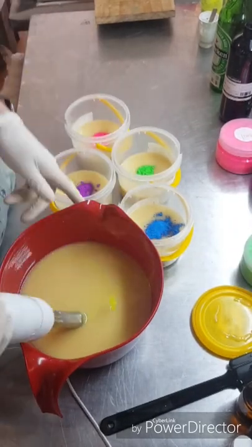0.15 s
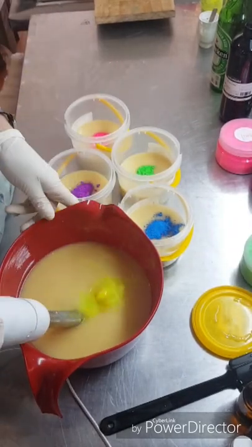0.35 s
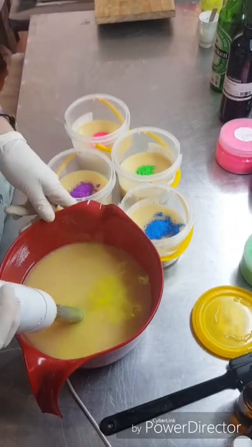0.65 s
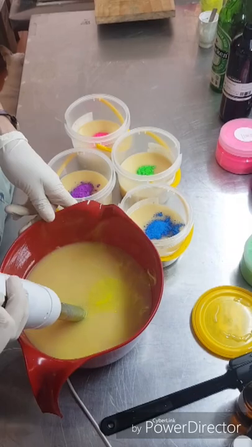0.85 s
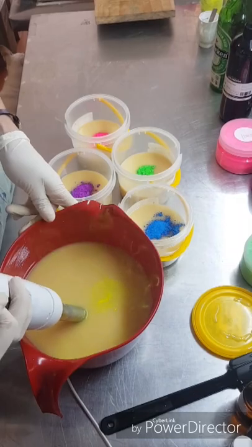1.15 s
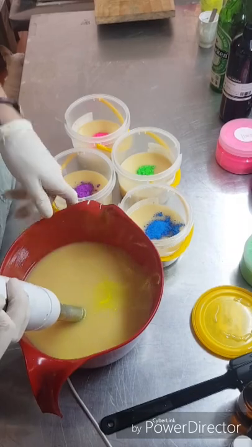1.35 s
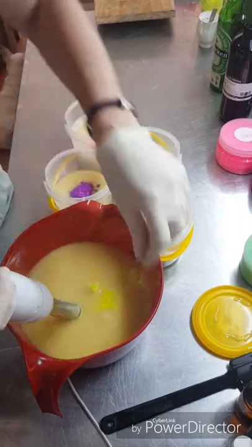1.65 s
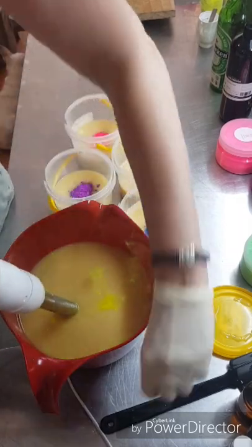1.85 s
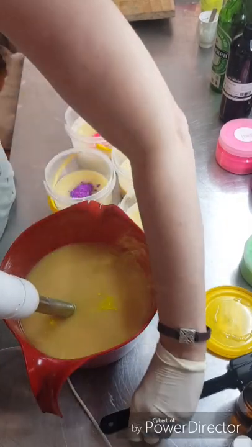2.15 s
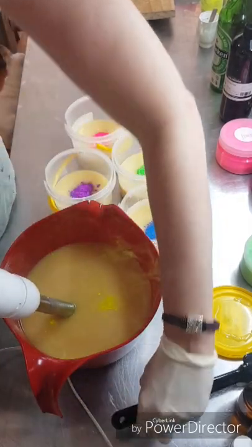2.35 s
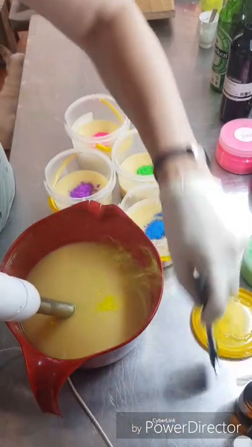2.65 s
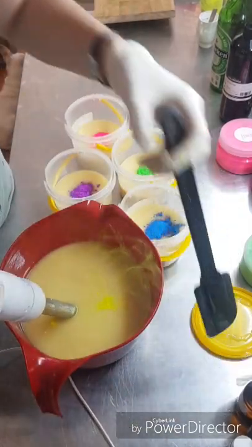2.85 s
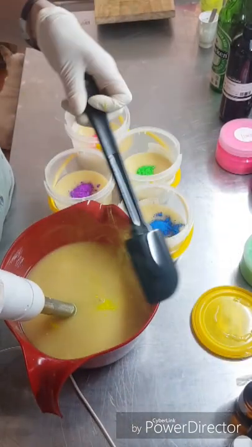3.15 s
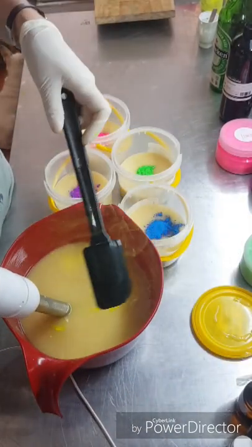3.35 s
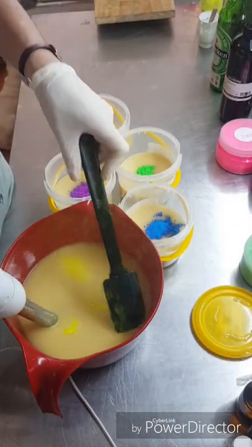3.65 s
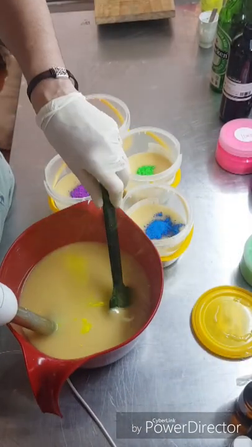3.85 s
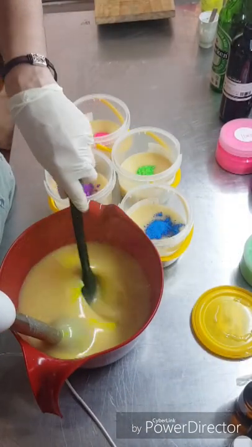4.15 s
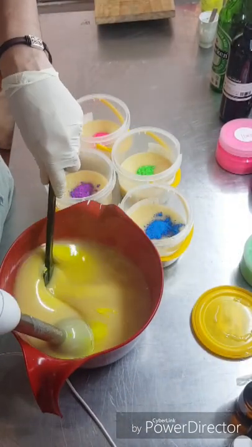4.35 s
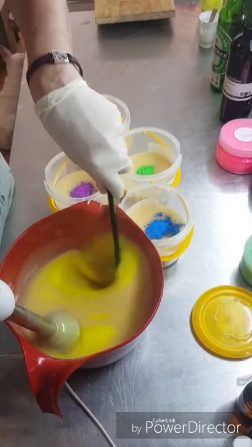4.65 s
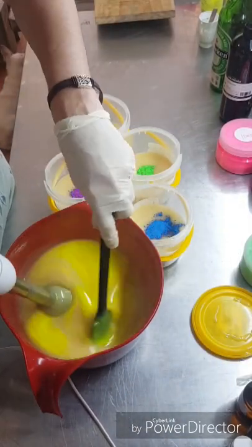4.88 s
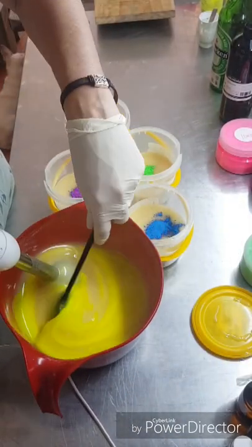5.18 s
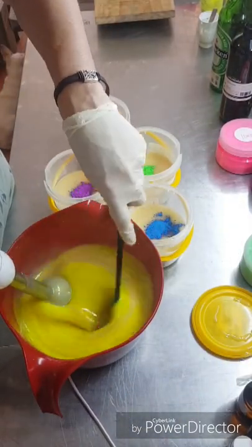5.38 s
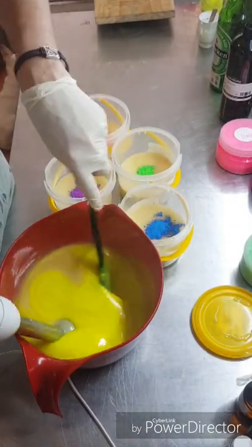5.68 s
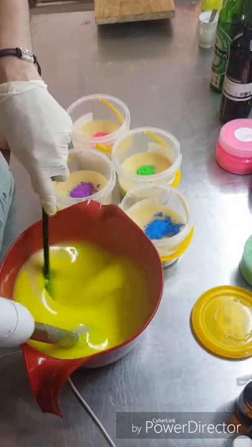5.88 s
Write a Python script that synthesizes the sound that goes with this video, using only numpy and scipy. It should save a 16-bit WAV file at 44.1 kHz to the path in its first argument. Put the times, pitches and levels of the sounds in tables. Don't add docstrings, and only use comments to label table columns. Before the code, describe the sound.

A handheld phone microphone close to a bowl catches hollow taps with a little steel ring and low table booms, then a stick blender pulsing four times in thick batter: a brighter, louder pair, a pause with gentle knocks, and a duller pair with the longest burst. Afterwards come only faint taps, tiny glove snaps and small bumps, with a low fridge hum in a small room.

```python
import sys
import numpy as np
from scipy import signal
from scipy.io import wavfile
from scipy.ndimage import uniform_filter1d

SR = 44100
rng = np.random.default_rng(int(sys.argv[2]) if len(sys.argv) > 2 else 0)


def generate_wav(sig):
    pcm = np.round(np.clip(np.atleast_2d(sig).T, -1, 1) * 32767).astype(np.int16)
    wavfile.write(sys.argv[1], SR, pcm)


def invert_db(x):
    u = np.asarray(x, float) / 20
    return 10 ** u


N = 265482
SIDE = np.array([[.5], [-.5]])


def evened(x):
    return x / np.sqrt(np.mean(x ** 2) + 1e-20)


def read(points, hz):
    f, value = np.transpose(points)
    return np.interp(np.log(hz + 1), np.log(f + 1), value)


def add(mix, s, sound):
    part = mix[..., round(s * SR):][..., :sound.shape[-1]]
    part += sound[..., :part.shape[-1]]


def wander(count, rate_hz):
    slow = signal.butter(2, rate_hz, fs=SR, output="sos")
    return evened(signal.sosfilt(slow, rng.standard_normal(count)))


def noise(count, colour, same, lean, patchy_db, size=512):
    hz = np.fft.rfftfreq(size, 1 / SR)
    a, b, c, d, patches = rng.standard_normal((count * 4 // size + 5, len(hz), 5)).T
    patches = uniform_filter1d(patches, size=4, axis=0)
    patches = evened(uniform_filter1d(patches, size=12, axis=1))
    like = np.clip(read(same, hz), -1, 1)[:, None]
    left = a + 1j * b
    right = like * left + np.sqrt(1 - like ** 2) * (c + 1j * d)
    z = np.array([left, right]) * invert_db(colour(hz)[:, None] + patchy_db * patches)
    z = z * invert_db(np.outer(SIDE, read(lean, hz)))[..., None]
    return signal.istft(z, nperseg=size, noverlap=size * 3 // 4)[1][:, :count]


def band_rms(x, lo, hi):
    band = signal.butter(4, [lo, hi], "band", fs=SR, output="sos")
    return np.std(signal.sosfilt(band, x.mean(0)))


def ring(modes, t, spread):
    out = 0
    for k, (hz, db, t60, lean_db, lead) in enumerate(modes):
        swing = 2 * np.pi * hz * (1 + spread * rng.standard_normal()) * t + 0.62 * k * k
        level_db = db + 2.1 * rng.standard_normal() - 60 * t / t60 + SIDE * lean_db
        out = out + invert_db(level_db) * np.sin(swing + SIDE * lead)
    return out


# (frequency [Hz], level [dB], waver [share])
FRIDGE_HUM = [(48.3, -61.5, 0.14), (74, -71, 1.9), (101, -55.5, .15), (113, -65.5, 2.2)]
# (frequency [Hz], level [dB per Hz])
ROOM_AIR = [(20, -12.5), (60, -5.5), (140, -3), (200, -8.5), (235, -12.5), (380, -12.5), (480, -19.5),
            (800, -32), (2200, -33), (6500, -36), (9000, -36), (15400, -33.5)]
# (frequency [Hz], likeness [-1 to 1])
AIR_SAME = [(60, 0.54), (240, 0.22), (950, 0.42), (3770, 0.19), (15000, -0.21)]
# (frequency [Hz], left-right [dB])
AIR_LEAN = [(60, -2), (240, 0.5), (950, -0.5), (3770, -3), (15000, 4)]


def fridge():
    t, lag_rad, hum = np.arange(N) / SR, .6, 0
    for hz, db, waver in FRIDGE_HUM:
        drift = 1 + waver * (wander(N, 4) + 1j * wander(N, 4.3))
        line = (drift * np.exp(2j * np.pi * hz * t - 1j * SIDE * lag_rad)).real
        hum = hum + invert_db(db + 4.5) / np.hypot(1, waver) * line
    air = noise(N, lambda f: read(ROOM_AIR, f), AIR_SAME, AIR_LEAN, patchy_db=3.0, size=2048)
    return hum * invert_db(SIDE * -1) + invert_db(-70.5) * air / band_rms(air, 146, 15800)


# (time [s], knock level [dB], steel ring level [dB])
KNOCKS = [(0.006, -25, -47), (0.089, -37, -63), (0.153, -38, -64), (0.197, -45, -85), (0.267, -44, -84),
          (0.407, -20.5, -41), (0.47, -31.5, -85), (0.487, -26, -46.5), (0.625, -22.5, -45.5),
          (0.704, -28, -51.5), (2.283, -34, -61), (2.365, -38, -65.5), (2.472, -52, -70.5),
          (2.555, -43.5, -69), (3.757, -45, -80), (3.822, -42, -65), (3.902, -33, -57), (3.977, -38.5, -59),
          (4.049, -36, -58.5), (4.12, -40.5, -70), (4.192, -38, -64), (4.261, -45, -74),
          (4.322, -42.5, -73), (4.376, -47.5, -86.5), (5.152, -39.5, -66), (5.235, -39.5, -63),
          (5.319, -53, -88.5), (5.902, -44, -83), (5.985, -55.5, -96)]
# (frequency [Hz], level [dB], T60 [s], left-right [dB], left lead [rad])
BOWL_MODES = [(192, 5, 0.15, -0.5, 4), (547.5, 15, 0.029, -4, 3.5), (760, 1, 0.15, -4.5, 2),
              (1010, -0.5, 0.042, 12, 5), (1125, 2, 0.04, 6, 4), (1546, -17.5, 0.15, 5.5, -3),
              (1870, -23.5, 0.054, -1, -1.5)]
BELL_MAIN = [(2727, 0.013, 0.21, -12, .3)]
BELL_UPPER = [(3290, -12.5, 0.22, -18.5, 0.22), (5570, -24.5, 0.04, -32, 0), (6400, -20, 0.06, -7, 0)]


def knock(knock_db, ring_db):
    t = np.arange(9000) / SR
    hard_db = -39.5
    upper_db = hard_db + 1.3 * (ring_db - hard_db)
    damped = invert_db(-13 / (1 + np.exp(-(t - .013) / .0015)))
    onset = np.sin(np.minimum(t / 0.0035, 1) * np.pi / 2) ** 2
    bowl = ring(BOWL_MODES, t, spread=0.02) * damped * onset
    bell = invert_db(ring_db - 6.5) * ring(BELL_MAIN, t, spread=0.0022)
    bell = bell + invert_db(upper_db - 4.5) * ring(BELL_UPPER, t, spread=.001)
    sunk = invert_db(-10 / (1 + np.exp(-(t - .055) / 0.019)) + 0.65 * wander(len(t), 60))
    return invert_db(knock_db - 12) * bowl + bell * sunk * np.minimum(t / 0.0013, 1)


# (time [s], table boom level [dB], clatter level [dB])
THUDS = [
    (0.325, -33.5, -75),
    (0.337, -35.5, -49.5),
    (0.545, -32, -47.5),
    (4.377, -49, -72.5),
    (5.276, -57, -73.5),
    (5.822, -44.5, -62.5),
    (5.859, -50, -73),
]
# (frequency [Hz], level [dB], T60 [s], left-right [dB], left lead [rad])
TABLE_MODES = [(66, 8, 0.38, -1.5, -1.4), (124, 0, 0.84, -1.5, -0.31), (202, -28, 0.19, -1, -1.2),
               (347.4, -12, 0.036, -21, -0.77), (690, -5, 0.054, 0.5, -.5), (1240, -51, 0.041, -7, 0.83),
               (1760, -36, 0.11, -9, 0.13), (2646, -29.5, 0.071, 1, 0.61)]
# (frequency [Hz], level [dB])
CLATTER = [(200, 15), (600, 11), (1300, -4), (1950, 1), (2500, -5), (4000, -17.5), (6500, -29),
           (9000, -40.5)]
# (frequency [Hz], likeness [-1 to 1])
CHURN_SAME = [(60, -1.6), (180, 1), (550, 0.15), (1650, 0.16), (4970, -0.042), (15000, 0.23)]
# (frequency [Hz], left-right [dB])
CHURN_LEAN = [(60, -15), (300, 0), (800, -2.5), (5800, -6), (7000, 1), (8500, 29), (10500, 11), (13000, 7),
              (15000, 1)]


def thud(boom_db, clatter_db):
    t = np.arange(14000) / SR
    rattle = noise(len(t), lambda f: read(CLATTER, f), CHURN_SAME, CHURN_LEAN, patchy_db=3.5, size=256)
    rattle = rattle / band_rms(rattle, 1400, 3200)
    rattle = rattle * invert_db(clatter_db - 2 - 60 * t / 0.22) * np.minimum(t / 0.0011, 1)
    boom = ring(TABLE_MODES, t, spread=0.035) * np.minimum(t / 0.0042, 1)
    return invert_db(boom_db - 5.0) * boom + rattle


# (time [s], level [dB], start [Hz], end [Hz], length [s], wobble [share])
BUBBLES = [
    (0.36, -38, 554, 1110, 0.041, 0.086),
    (2.136, -66, 1880, 2010, 0.081, 0.14),
    (4.805, -68, 870, 760, 0.026, 0.063),
    (5.506, -62, 700, 730, 0.018, 0.017),
]


def bubble(db, start_hz, end_hz, length, wobble):
    part = np.minimum(np.arange(4000) / SR / length, 1)
    hz = (start_hz + (end_hz - start_hz) * part) * (1 + wobble * wander(len(part), 350))
    tone = np.sin(2 * np.pi * np.cumsum(hz) / SR)
    return invert_db(db + 1.1 * wander(len(part), 170)) * tone * np.sin(np.pi * part ** 0.45)


LOADED_HZ = 175.4


def drive(pulses, freed, t):
    begin, rise, share, gained_hz = freed
    creep_hz, spin_up_s, brake_lag_s = 52, .037, .012
    build_s = 0.074
    clear = np.clip((t - begin) / rise, 0, 1)
    coast_s = .11 + (.08 - .11) * clear
    hz, level_db, shaft_db, held = np.zeros((4, len(t)))
    for on, off, churn_db, tone_db, build_db in pulses:
        now, since, after = t >= on, np.clip(t - on, 0, off - on), np.maximum(t - off, 0)
        top = LOADED_HZ + gained_hz * clear
        run = top - (top - np.interp(on, t, hz)) * np.exp(-since / spin_up_s)
        left = np.exp(-after ** 2 / (after + brake_lag_s) / coast_s)
        hz = np.where(now, creep_hz + (run - creep_hz) * left, hz)
        sag_db = build_db * np.exp(-since / build_s) + 3.5 * since
        drag_db = 5 * (t > off) + 58 * after * (1 - share * clear)
        level_db = np.where(now, churn_db - sag_db - drag_db, level_db)
        shaft_db, held = np.where(now, tone_db, shaft_db), np.where(now, since, held)
    churn_db = uniform_filter1d(level_db, size=500) + 2.36 * 20 * np.log10(hz / LOADED_HZ + 1e-3)
    free = np.clip(share * clear * left, 0, 1)
    return hz, free, clear, churn_db, uniform_filter1d(shaft_db, size=900), held


PULSES = [
    [(.899, 1.097, -25.5, 4.5, 26), (1.203, 1.638, -30, -5.5, 1.5)],
    [(2.701, 2.888, -29.5, -11.5, 12.5), (3.007, 3.555, -31.5, -23, 2.5)],
]
# (time [s], rise [s], share [0-1], speed gained [Hz])
FREED = [
    (1.439, .12, 0.8, 6),
    (3.117, 0.128, 0.98, 2.6),
]
# (frequency [Hz], level [dB per Hz])
CHURN = [(35, -42), (70, -22), (150, -14), (240, -21), (330, -7.5), (600, -12.5), (1000, -9.5),
         (2200, -16.5), (3200, -21), (5700, -27.5), (6700, -38), (7500, -37), (8300, -48), (10500, -33),
         (15400, -41.5)]
# (frequency [Hz], width [Hz], level [dB])
HOUSING = [(475, 43, 6), (700, 150, 8), (1330, 13, 6.5), (1607, 48, 4), (1925, 25, 9.5), (2043, 92, 5.5),
           (2328, 140, 2.5), (5310, 440, 1.5)]
# (shaft multiple, level against the fourth [dB])
UPPER_ORDERS = [(3, -2), (4, 0), (5, -7), (6, -15), (7, -5.5), (8, -15), (10, -17)]
# (frequency [Hz], level over churn [dB])
FIRST_PATH = [(100, -8.5), (135, -6), (160, -7), (180, -0.5)]
SECOND_PATH = [(230, -10.5), (295, 0.5), (322, 8), (340, 5.5), (349, 7), (356, -0.5), (364, -15)]
FOURTH_PATH = [(420, -10), (600, -15), (660, 3.5), (730, -8.5)]
# (shaft speed [Hz], level [dB])
COAST_PATH = [(60, 7), (85, 11.5), (105, 14.5), (135, 8), (180, -4)]
# (frequency [Hz], level [dB])
WHINE_PATH = [(1800, -30), (2350, -12), (2560, 5), (2850, 0), (3250, 1), (3550, -3), (3800, -20)]


def motor(pulses, freed):
    start, end = pulses[0][0], pulses[-1][1] + .245
    t = start + np.arange(50000) / SR
    hz, free, clear, churn_db, shaft_db, held = drive(pulses, freed, t)
    powered = uniform_filter1d(sum((t > on) & (t < off) for on, off, *_ in pulses) * 1., size=600)
    clogged = np.clip((held - .11) / .04, 0, 1) * (1 - free)

    coast_db = (1 - powered) * (clear * read(COAST_PATH, hz) + (1 - clear) * -12)
    steadied = np.clip((t - freed[0]) / 0.31, 0, 1)
    first_db = churn_db + coast_db + read(FIRST_PATH, hz) + shaft_db + steadied * (4 - shaft_db)
    below_speed = np.clip((LOADED_HZ - hz) / 11, 0, 1)
    second_db = churn_db + read(SECOND_PATH, 2 * hz) + .4 * shaft_db * below_speed
    second_db = second_db - 28.5 * np.maximum(held - .17, 0)
    fourth_db = churn_db - clogged + read(FOURTH_PATH, 4 * hz) + 8 * free
    first_db = np.minimum(first_db, fourth_db - 4.5 + 40 * (1 - free))
    second_db = second_db + free ** 6 * (fourth_db - 5 - second_db)

    shudder = .001 + .0015 * np.maximum(178 - hz, 0) ** .7
    turn = 2 * np.pi * np.cumsum(hz * (1 + shudder * wander(len(t), 30))) / SR

    def order(k, db):
        level = np.sqrt(2) * invert_db(db + (2.0 - 1.3 * free) * wander(len(t), 16))
        return level * np.sin(k * turn + 2 * np.pi * rng.random() + SIDE * -.6 * np.cos(np.pi * k))

    upper = sum(order(k, fourth_db + db - (k != 4) * 8 * (1 - free)) for k, db in UPPER_ORDERS)
    tones = order(1, first_db) + (.4 + .6 * powered) * order(2, second_db)
    tones = tones + (.15 + .85 * powered) * upper

    whine = sum(order(k, churn_db + db + read(WHINE_PATH, k * hz)) for k, db in ((16, -6.5), (24, -8.5)))
    broken_db = 2.5 * (1 - .6 * free) * wander(len(t), 28)
    whine = whine * invert_db(3.5 * (0.5 - free) - 9 * clogged + broken_db) * powered
    whine = whine * (1 + 2 * invert_db(-11) * np.cos(2 * np.pi * 102.1 * t))
    buzz = signal.lfilter(*signal.iirpeak(2540, 2540 / 150, SR), rng.standard_normal(len(t)))
    inrush = held / .038 * np.exp(1 - held / .038)
    whine = whine + invert_db(-48) * evened(buzz) * powered * inrush ** 3

    def colour(f):
        return read(CHURN, f) + sum(db * np.exp(-((f - at) / w) ** 2) for at, w, db in HOUSING)

    churn = noise(len(t), colour, CHURN_SAME, CHURN_LEAN, patchy_db=1.7, size=1024)
    throb = 1 + 0.13 * np.cos(turn)
    churn = churn / band_rms(churn, 1400, 8100) * throb * invert_db(churn_db + 0.74 * wander(len(t), 32))
    rattle = signal.oaconvolve(churn, signal.firwin(255, 1600, fs=SR)[None], "same")
    slow = np.clip((150 - hz) / 70, 0, 1)
    churn = churn - (.68 * free + .6 * slow * powered * (1 - free)) * rattle
    churn = churn + .4 * clear * (1 - powered) * invert_db(3.5 * wander(len(t), 18)) * rattle
    fade = np.clip(np.minimum((t - start - .009) / .006, (end - t) / .09), 0, 1)
    return start, (churn + (tones + whine) * invert_db(-3.3 * SIDE)) * fade


# (time [s], level [dB], centre [Hz])
CRACKLES = [(3.790, -62, 9300), (4.048, -60.5, 9220), (4.193, -65, 8700), (4.329, -69, 11060),
            (4.376, -56, 9630), (4.432, -60.5, 11730), (4.461, -61.5, 11250), (4.514, -64, 10960),
            (4.538, -64, 9300), (4.574, -60, 10050), (4.628, -56, 9800), (4.793, -61, 12800),
            (4.837, -63.5, 12700), (4.889, -66, 9370), (5.188, -71, 10900), (5.259, -60, 11590),
            (5.379, -62.5, 10350), (5.410, -65, 10800), (5.435, -58.5, 10060), (5.568, -58, 9620),
            (5.617, -64.5, 9710), (5.687, -67, 11050), (5.898, -68.5, 11880)]
SNAPS = [
    (2.626, -56.5, 4760),
    (3.794, -52.5, 2470),
    (4.377, -49.5, 4430),
    (5.569, -68.5, 4470),
]


def crackle(db, hz):
    t = np.arange(8000) / SR
    edges = np.clip([hz / 1.13, hz * 1.24], 50, 16000)
    band = signal.butter(3, edges, "band", fs=SR, output="sos")
    fizz = evened(signal.sosfilt(band, rng.standard_normal((2, len(t)))))
    decay = invert_db(-60 * t / 0.0081) + 0.43 * invert_db(-60 * t / 0.16)
    return invert_db(db - 4.0) * fizz * decay * invert_db(5 * SIDE)


# (frequency [Hz], T60 [s])
ROOM_T60 = [(100, 0.66), (1000, 0.23), (8000, 0.033)]


def room(x):
    taps = np.zeros((2, SR // 2))
    at = np.arange(200, SR // 2 - 20, 20)
    spots = at + rng.integers(0, 20, (2, len(at)))
    np.put_along_axis(taps, spots, rng.choice([-1., 1.], (2, len(at))), 1)
    hz, t, z = signal.stft(taps, SR, nperseg=256)
    tail = signal.istft(z * invert_db(-60 * t / read(ROOM_T60, hz)[:, None]), SR, nperseg=256)[1]
    return signal.fftconvolve(x, tail / np.linalg.norm(tail[0]), axes=1)[:, :N]


def scene():
    pulses, small = np.zeros((2, N)), np.zeros((2, N))
    for s, *blow in KNOCKS:
        add(small, s, knock(*blow))
    for s, *blow in THUDS:
        add(small, s, thud(*blow))
    for s, *pocket in BUBBLES:
        add(small, s, bubble(*pocket)[None])
    for pair, freed in zip(PULSES, FREED):
        add(pulses, *motor(pair, freed))
    for s, *snap in CRACKLES + SNAPS:
        add(small, s, crackle(*snap))
    echoed = pulses + invert_db(-20) * room(pulses)
    return echoed + small + invert_db(-26.0) * room(small) + fridge()


def top_cut(x):
    return signal.sosfilt(signal.butter(12, 15680, fs=SR, output="sos"), x)


def record(dry):
    notch = signal.iirnotch(7420, 7420 / 900, SR)
    dipped = .15 * dry + .85 * signal.lfilter(*notch, dry)
    lowpass = signal.firwin(1023, 15480, window=("kaiser", 9), fs=SR)
    limited = signal.oaconvolve(dipped, lowpass[None], "same")
    return top_cut(limited)


dry = scene()
out = record(dry)
generate_wav(out)
```